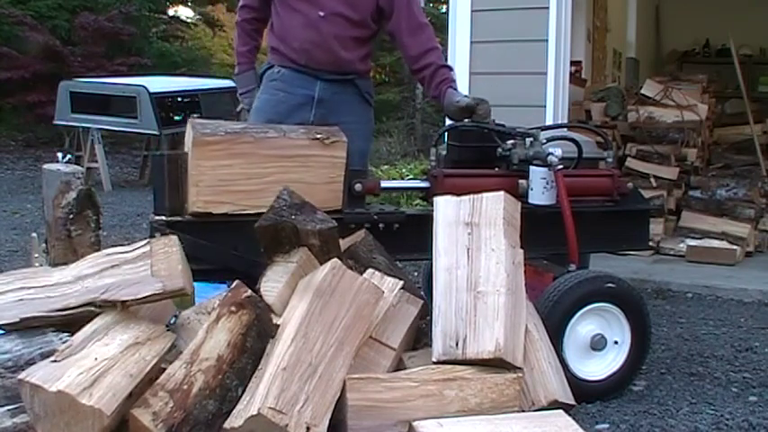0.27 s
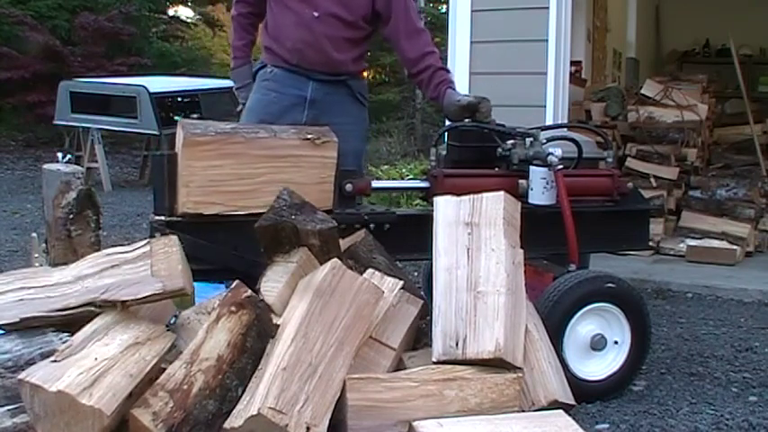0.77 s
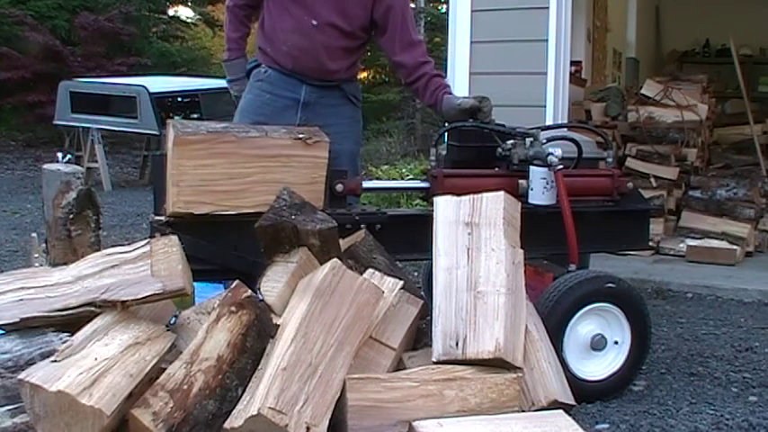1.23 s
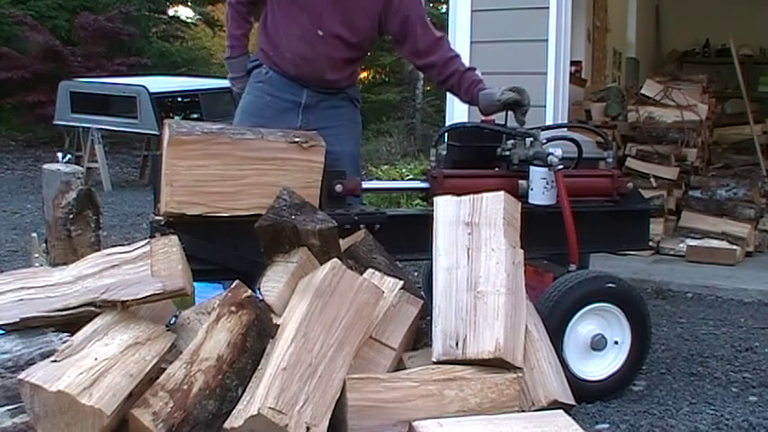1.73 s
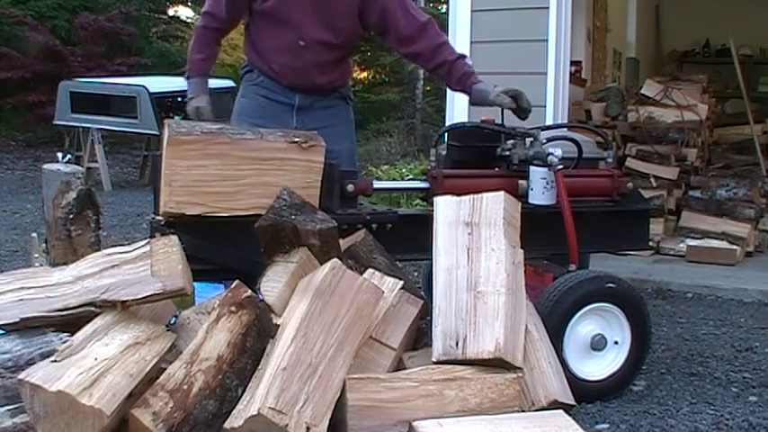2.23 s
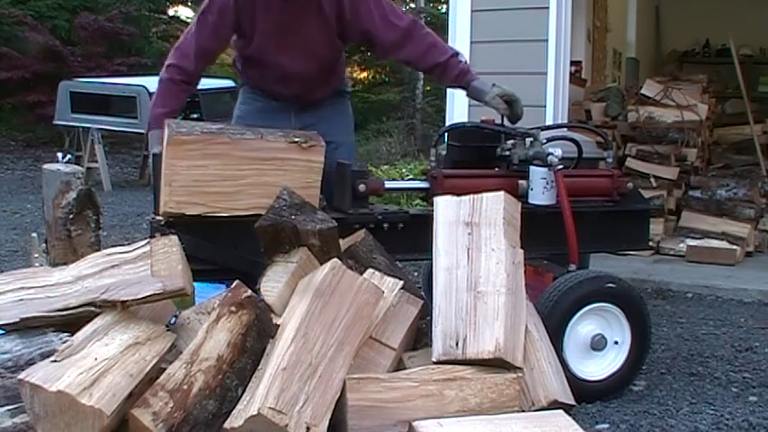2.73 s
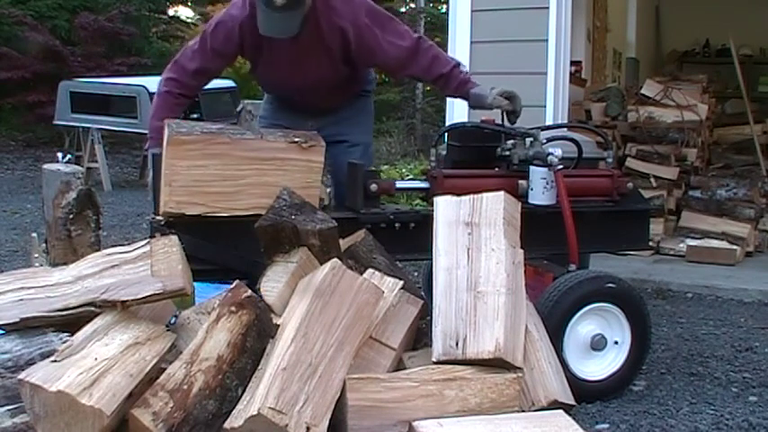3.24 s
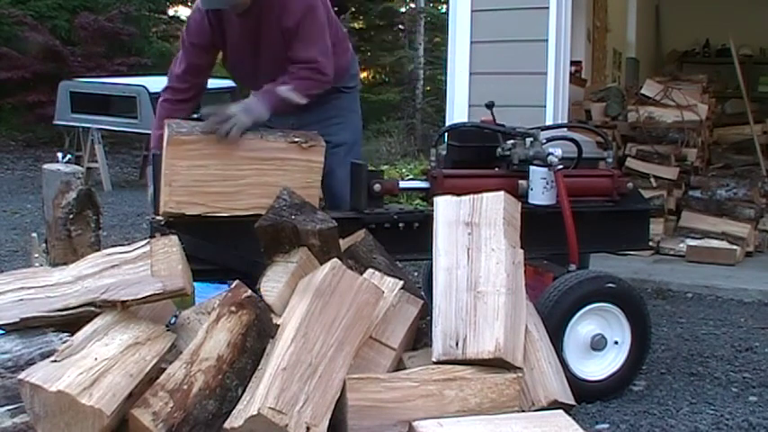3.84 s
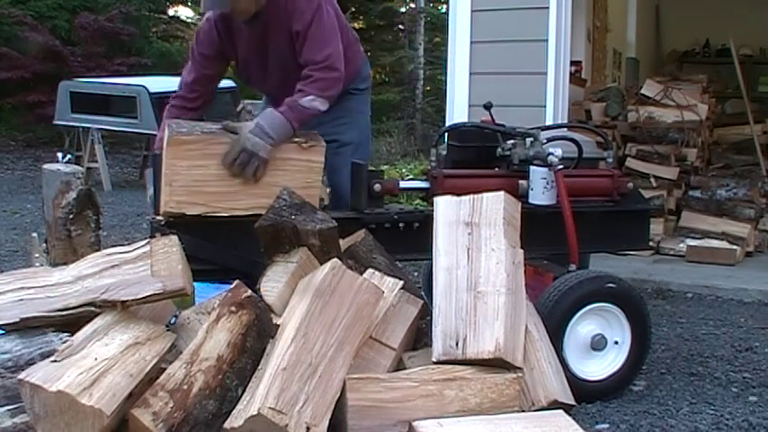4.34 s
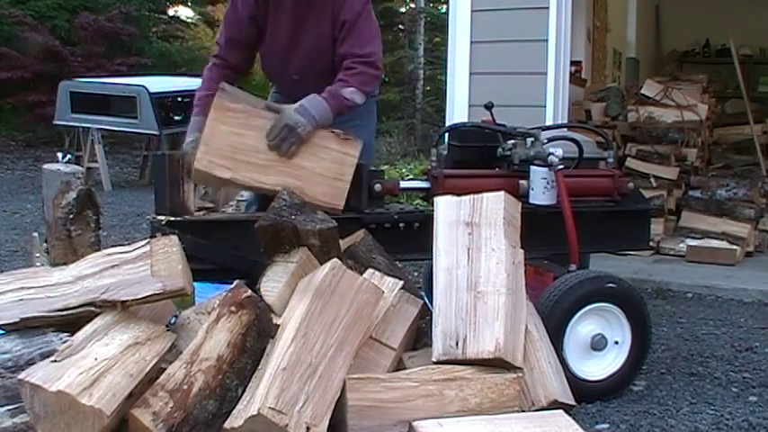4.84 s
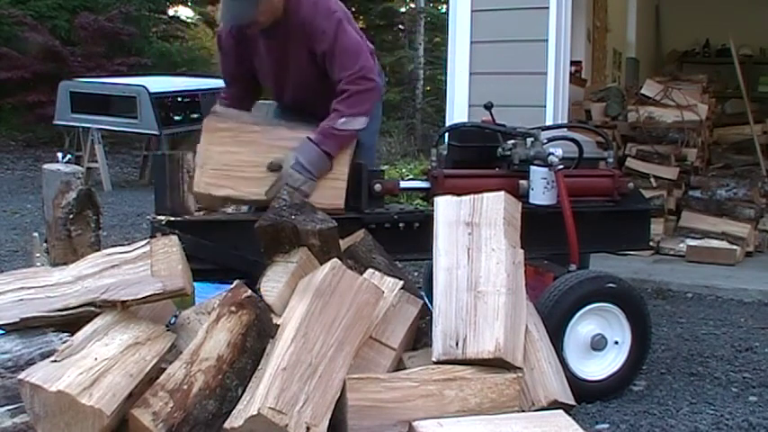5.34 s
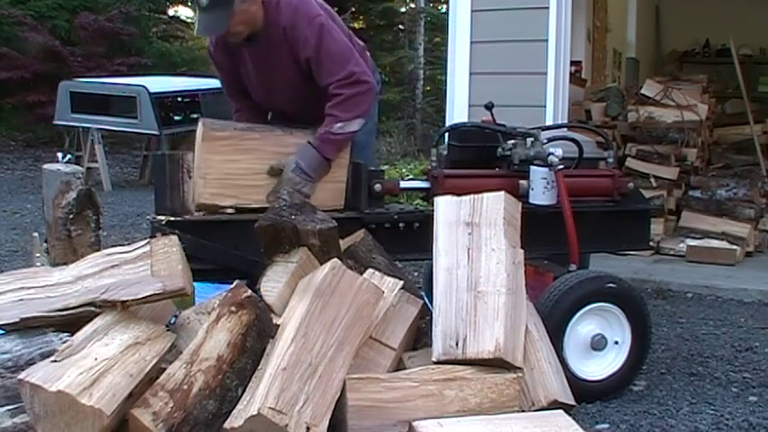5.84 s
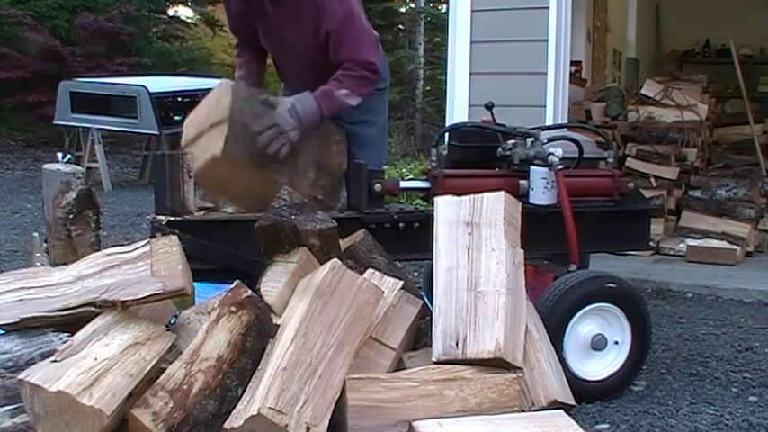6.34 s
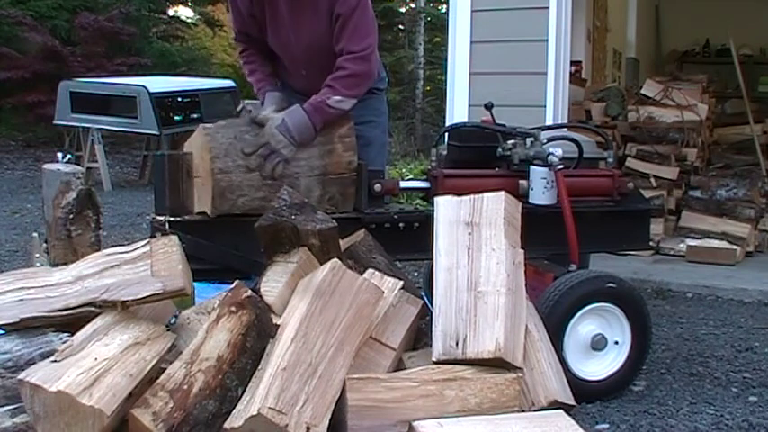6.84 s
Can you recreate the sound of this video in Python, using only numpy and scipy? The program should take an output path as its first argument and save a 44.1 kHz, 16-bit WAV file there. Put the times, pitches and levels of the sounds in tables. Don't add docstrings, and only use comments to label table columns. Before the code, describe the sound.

Outdoors in a yard, a single-cylinder engine drives a log splitter close to a small camera microphone. At once a log tears with a dense volley of bright cracks, the engine sagging, then racing briefly. The cracks stop, the engine swells back to a steady rattling drone, a valve lever clacks, small steel parts tick, and the turned log knocks heavily onto the beam.

```python
import sys
import numpy as np
from scipy import signal
from scipy.fft import rfft, irfft, next_fast_len
from scipy.io import wavfile
from scipy.ndimage import uniform_filter1d, map_coordinates

SR = 44100
rng = np.random.default_rng(int(sys.argv[2]) if len(sys.argv) > 2 else 0)


def amplitude_ratio(level_db):
    exponent = np.asarray(level_db, float) / 20
    return 10 ** exponent


def store_wav(level_fs):
    pcm = np.round(np.clip(np.atleast_2d(level_fs), -1, 1) * 32767)
    wavfile.write(sys.argv[1], SR, pcm.T.astype(np.int16))


N = 313110

# (time [s], firing rate [1/s])
FIRING_RATE = [(0.0, 21.9), (0.08, 21.9), (0.24, 20.7), (0.35, 20.8), (0.57, 24.1), (0.75, 26.5),
               (0.79, 26.5), (0.99, 24.0), (1.16, 24.1), (1.56, 25.17), (2.31, 24.3), (3.42, 24.77),
               (3.82, 25.5), (4.51, 24.7), (5.04, 24.7), (5.75, 25.0), (7.0, 24.9), (7.1, 24.6)]
# (time [s], level [dB])
CAMERA_GAIN = [(0, 0), (.25, -0.5), (.39, -2.5), (.45, -7.5), (.54, -9), (.67, -4.5), (.82, -4),
               (.85, -8.5), (1.3, -9), (1.54, -6), (1.56, -5), (2.2, 1), (3.3, 0), (3.55, -2), (3.96, 1),
               (4.6, -1), (6.05, 0), (6.45, -1.5), (7.1, -0.5)]
# (time [s], share of travelling colour [0-1], oil pressure at the pump [dB],
# shake of the frame [dB], share of bare-beam colour [0-1])
RAM = [(0, 0.29, -32, -14, 0.043), (1.2, 0.61, -14, 0, 0.13), (1.55, 0.11, -9, 1, 0.04),
       (1.9, 0.5, -18, -2, 0.17), (2.3, 0.88, -10, 1, 0.15), (2.8, 0.96, -16, 4.5, 0.17),
       (2.9, 0.593, -2, 3, 0.26), (3.3, 0.67, -2, -13, 0.28), (3.55, 0.55, -11, 2, 0.072),
       (3.8, 0.12, -15, -12, 0.039), (4.1, 0.047, -6, 2, 0.18), (4.35, 0.094, -9, 1, 0.28),
       (4.55, 0.22, -11, 9, 0.98), (5.45, 0.17, -9, -7, 0.94), (5.65, 0.32, -4, 3, 0.19),
       (5.9, 0.15, -1, 3, 0.25), (6.2, 0.13, -3.5, 11, 0.3), (6.4, 0.13, -7.5, -2, 0.27),
       (7.1, 0.12, -7, 4, 0.38)]
# (multiple of firing rate [1], level at rest [dB], ram travelling back [dB], log off the beam [dB])
LOW_ORDERS = [(1, -50, -52, -50), (2, -42, -46, -42), (3, -45, -46, -45), (4.01, -19, -21, -20),
              (5, -18.5, -16, -16), (6.03, -8.5, -7.5, -8), (7.73, -3, -17, -12.5), (8.07, -29, -13, -18),
              (9.22, -12.5, -30.5, -13.5), (10.13, -7.5, -5, -2), (11.53, -23, -3.5, -12.5),
              (12, -5.5, -26.5, -6.5), (13, -16, -23, -11.5), (14, -5.5, -11.5, -9.5), (15, -36, -10, -37),
              (16, -3, -11.5, -23), (16.8, -4, -8, -39), (18, -4, -1.5, -9.5), (18.8, -9.5, -23, -4.5),
              (20, -3, -6, 0), (21.5, -3, -15, -3), (21.8, -7.5, 0.5, -37), (23.2, -5, -13, 4),
              (24, -3.5, -4.5, -7), (24.7, -17, -26, -12)]
# (frequency [Hz], width [Hz], at rest [dB], travelling [dB], beam bare [dB])
ORDER_RESONANCES = [(580, 35, -21, -14, -25), (680, 34, -31, -4.5, -27), (766.4, 14, 5, 0.5, 5),
                    (706, 14, -8, -10, -1), (815, 15, 3, -18, -3.5), (847, 9.2, 2, -13, -17),
                    (902, 18, -10, -9.5, -15), (1019, 7.3, -15.5, -10, 1), (1125, 13, -13, -30, -1),
                    (1313, 45, -9, -11, -15), (1427, 25, -5, -5, -26), (1516, 80, -15, -15.5, -23),
                    (1520, 17, 0, -16, -25), (1679, 20, -14, -6, -2), (1805, 25, -9, 4, -9)]
# (share of cycle [1], level [dB])
TANK_BLOWS = [
    (.12, -4),
    (.32, -3),
    (.52, -2),
    (.94, 0),
]
# (share of cycle [1], level [dB])
PANEL_TAPS = [
    (.08, -3),
    (.31, 0),
    (.56, 0),
    (.91, 0),
]
# (share of cycle [1], level [dB])
VALVE_KNOCKS = [
    (0.06, -9),
    (0.298, -15),
    (0.41, -15),
    (0.502, -15),
    (0.74, -10.5),
    (.92, -25),
]
# (time [s], level [dB])
SKIPPED_FIRINGS = [
    (.868, -10),
    (.946, -11),
]
# (frequency [Hz], density [dB/Hz])
CASING_SPECTRUM = [(180, -135), (300, -8.5), (353, -18), (400, 1), (477, 3.5), (628, 0), (768, 4.5),
                   (915, 5), (962, -2), (1190, -5), (1510, -3.5), (2170, 2), (2460, -4.5), (3410, -24),
                   (6000, -16.5), (7800, -82), (13200, -120)]
# (frequency [Hz], width [Hz], level [dB])
PANEL_MODES = [(778, 21, -2), (987, 47, -6), (1550, 910, 3.5), (1675, 5.4, 11), (2224, 7.4, 10.5),
               (2940, 11, 23), (3400, 86, 27), (4200, 13, 29.5)]
# (frequency [Hz], density [dB/Hz])
FAN_SPECTRUM = [(1470, -6), (2500, -5.5), (3370, -6), (3860, -7), (4140, -6), (5870, -9.5), (10300, -7.5),
                (15200, -23), (16100, -17), (16500, -57)]
# (frequency [Hz], density [dB/Hz])
RUMBLE_SPECTRUM = [(12, -72), (20, -42), (48, -30), (145, 0), (296, -3), (392, -24), (500, -3), (650, -29),
                   (1100, -120)]
# (frequency [Hz], left-right likeness [0-1])
PORT_LIKENESS = [(60, .97), (130, .97), (290, .78), (640, .82), (1410, .62), (3100, .55), (8000, .5),
                 (15000, .45)]
# (frequency [Hz], left over right [dB])
PORT_BALANCE = [(60, 1), (130, 2.3), (290, 1.6), (640, 1.9), (1410, 1.5), (3100, -2.0), (6820, 0.0),
                (15000, 0.0)]
# (frequency [Hz], left leads by [rad])
PORT_LEAD = [(0, 0), (860, -0.3), (2150, -1.4), (2580, -1.7), (2930, -0.8), (3620, -1.2), (4050, -0.8),
             (4390, -1.1), (5430, -0.9), (7670, -1.3), (9220, -1.2), (12500, -2.2), (13500, -2.3),
             (16400, -3.1)]
# (time [s], level [dB])
FIBRE_LEVEL = [(0, -56), (.2, -20), (.43, -18.5), (.48, -27), (.56, -28.5), (.66, -27), (.78, -26),
               (1, -39), (1.3, -52), (1.8, -57), (7.1, -62)]
# (time [s], snap level [dB], body level [dB], body frequency [Hz], snap frequency [Hz])
WOOD_CRACKS = [(0.097, -13, -27, 1700, 8450), (0.166, -20, -21, 1420, 9000), (0.2237, -14, -18, 1500, 8500),
               (0.2327, -14, -14, 1300, 9000), (.238, -9, -12, 1690, 8800), (0.241, -0.5, -15, 1690, 8300),
               (.273, -15, -13, 1500, 9000), (0.2802, -4, -12.5, 3000, 10300), (0.2856, 0, -12, 2100, 8900),
               (0.293, -1, -27, 2260, 8900), (0.314, -6, -23, 1400, 8900), (0.3177, -11, -15, 1620, 9500),
               (0.327, 3, -25, 2010, 9050), (0.3705, -1, -22, 3330, 8600), (.385, -11, -21, 2000, 9000),
               (0.3933, -11, -5, 2580, 10600), (0.428, -14, -19, 1680, 8800), (0.441, -2, -4, 1620, 8350),
               (.4412, -14, -15, 4800, 12500), (0.462, 5, -9, 3690, 10900), (.4835, -18, -36, 3000, 11000),
               (.5128, -9, -24, 3180, 10000), (0.54, -15, -27, 2600, 9500), (.5495, -17, -38, 2500, 10500),
               (0.588, -12, -17.5, 2800, 7500), (0.6102, -10, -27, 2100, 9900),
               (0.6256, -20, -15.5, 1870, 8500), (0.6727, -11, -16, 2520, 9600),
               (.677, -17, -20, 2640, 9000), (0.757, -6, -24, 2240, 8900), (0.761, -3.5, -14, 2300, 8500),
               (0.8170, -3.5, -21, 2540, 9340), (.831, 0.5, -15, 3430, 8120), (.8385, -14, -19, 3700, 8000),
               (1.0184, -3, -16.5, 3700, 9500), (1.018, -20, -24, 1820, 6940), (1.048, -7, -32, 3530, 8700),
               (1.0522, -13, -19, 2500, 8900), (1.1034, -24, -26, 1960, 8000),
               (1.11, -6.5, -38, 1700, 8300), (1.1308, -8, -25, 1850, 10500), (1.1561, -8, -21, 1720, 8160),
               (1.204, -3.5, -24, 1720, 9500)]
# (time [s], peak level [dB], decay t60 [s], low mode [Hz], high mode [Hz])
LOG_THUDS = [(.19, -23, 0.15, 262, 276), (0.229, -21, 0.23, 257, 274), (0.299, -19, 0.1, 250, 262),
             (.671, -9.5, 0.036, 473, 558), (.6725, -15, 0.039, 810, 1260), (.684, -19, 0.033, 517, 890),
             (4.883, -9.5, 0.036, 2085, 2240), (6.3028, 0.5, 0.033, 574, 735),
             (6.3095, -4, 0.014, 604, 780), (6.351, -10, 0.03, 450, 534), (6.4075, -10, 0.07, 620, 680),
             (6.429, -6, 0.02, 506, 696)]
# (time [s], snap level [dB], body level [dB], body frequency [Hz], rise [s])
LEVER_SNAPS = [(1.6824, -13, -17, 5340, 0.00062), (1.7014, -15, -30, 5000, .0005),
               (3.4341, -3.5, -13.5, 4600, 0.0013), (3.542, -15, -36, 4080, .0017),
               (3.5511, -16, -19, 4500, 0.0041), (3.569, -17, -28, 4200, 0.0059),
               (3.583, -15, -22, 4200, 0.0026), (4.504, -3, -34, 6250, 0.00083),
               (4.526, -8, -36, 6000, 0.0009), (4.58, -13, -17, 4000, .0009),
               (5.655, -11, -22, 3480, 0.0015)]
# (time [s], peak level [dB], frequency [Hz], decay t60 [s])
STEEL_TICKS = [(3.5153, -24, 10300, .03), (3.437, -15, 10200, .05), (3.436, -24, 14500, .025),
               (3.553, -27, 14700, .025), (3.557, -13, 10200, .03), (3.579, -31, 14800, .03),
               (3.585, -23, 10200, .04), (3.727, -30, 14600, .04), (4.6637, -22, 10100, .02),
               (5.851, -19, 11000, .03), (5.876, -24, 9950, .04), (5.897, -17, 9900, .04),
               (6.311, -17, 11200, .02), (6.4042, -17, 9900, 0.027), (6.455, -21, 10100, .06),
               (6.4546, -31, 14750, .07)]

STEP = 6
REST_HZ, RETURN_HZ = 24.85, 24.45


def unit(x):
    return x / np.sqrt(np.mean(x ** 2) + 1e-20)


def along(points, hz):
    f, v = np.transpose(points)
    return np.interp(np.log(hz + 1), np.log(f + 1), v)


def curves(rows):
    s, *cols = np.transpose(rows)
    return [np.interp(np.arange(N) / SR, s, c) for c in cols]


def wobble(rate):
    knots = rng.standard_normal(int(N * rate / SR) + 4)
    return map_coordinates(knots, [np.arange(N) * rate / SR], order=1)


def filtered(x, response):
    m = next_fast_len(N + SR // 4)
    return irfft(rfft(x, m) * response(np.fft.rfftfreq(m, 1 / SR)), m)[..., :N]


def resonance(f, hz, width_hz):
    return 1j * f * width_hz / (hz * hz - f * f + 1j * f * width_hz)


def ports(direct, scattered):
    def turn(hz):
        return np.arccos(np.clip(along(PORT_LIKENESS, hz), 0, 1)) / 2

    def half(hz):
        lead = np.interp(hz, *np.transpose(PORT_LEAD))
        return amplitude_ratio(along(PORT_BALANCE, hz) / 2) * np.exp(.5j * lead)

    both = np.array([direct, scattered])
    a, b = filtered(both, lambda hz: [np.cos(turn(hz)), np.sin(turn(hz))])
    return filtered(np.array([a + b, a - b]), lambda hz: [half(hz), 1 / half(hz)])


def strength(k, speed, column):
    if k > 25:
        between = amplitude_ratio(-19)
        passed = sum(amplitude_ratio(row[2 + column]) * abs(resonance(k * speed, row[0], row[1])) ** 2
                     for row in ORDER_RESONANCES)
        return 20 * np.log10(between + passed)
    place = k * speed / (REST_HZ, RETURN_HZ, REST_HZ)[column] if k < 10 else k + 0 * speed
    return np.interp(place, *np.transpose(LOW_ORDERS)[[0, column + 1]])


def orders(cycle, first, last, spread, drift_db, slip, blows=((0, 0),)):
    time = np.arange(0, N, STEP)
    coarse = np.arange(0, N, 441)
    share, _, _, off_beam = curves(RAM)
    speed, travel, bare = curves(FIRING_RATE)[0][coarse], share[coarse], off_beam[coarse]

    def slow(rate):
        return np.interp(time * rate / SR, np.arange(rate * 8), rng.standard_normal(rate * 8))

    out = 0
    for k in range(first, last + 1):
        pattern = sum(amplitude_ratio(b) * np.exp(-2j * np.pi * k * at) for at, b in blows)
        angle = 2 * np.pi * k * cycle[::STEP] - np.pi / 2 + np.angle(pattern)
        angle = angle + rng.normal(0, spread) + slip * slow(10)
        db = drift_db * slow(2)
        if last > first:
            level = (1 - travel) * strength(k, speed, 0) + travel * strength(k, speed, 1)
            level = (1 - bare) * level + bare * strength(k, speed, 2)
            db = db + np.interp(time, coarse, level)
        out = out + amplitude_ratio(db) * np.cos(angle + rng.uniform(0, 2 * np.pi) * np.array([[0], [1]]))
    return unit(signal.resample_poly(out, STEP, 1, axis=1)[:, :N])


def clatter(cycle):
    turns = np.arange(int(cycle[-1]) + 1)
    blows = np.zeros(N)
    for share, db in VALVE_KNOCKS:
        place = turns + share + rng.normal(0, 0.0075, len(turns))
        at = np.interp(place, cycle, np.arange(N)).astype(int)
        blows[at] += amplitude_ratio(db + rng.normal(0, 1.3, len(turns)))
    t = np.arange(SR // 50) / SR
    stamp = signal.fftconvolve(blows, amplitude_ratio(-60 * t / 0.01) * rng.standard_normal(len(t)))[:N]
    gate = signal.fftconvolve(blows, t * amplitude_ratio(-60 * t / 0.046))[:N]
    return unit(stamp), gate / gate.mean()


def layer_db(at_rest, per_gain, per_sag, travelling):
    sag = REST_HZ - curves(FIRING_RATE)[0]
    return at_rest + per_gain * curves(CAMERA_GAIN)[0] + per_sag * sag + travelling * curves(RAM)[0]


def engine():
    cycle = np.cumsum(curves(FIRING_RATE)[0]) / SR + .06
    travel, oil_db, shake_db, _ = curves(RAM)
    casing_db = layer_db(-24, per_gain=1.29, per_sag=0.59, travelling=0.49)
    exhaust_db = layer_db(-34, per_gain=1.23, per_sag=0.36, travelling=1.4)
    silencer_db = layer_db(-32.5, per_gain=1.33, per_sag=-0.56, travelling=0.27)
    fan_db = layer_db(-22.5, per_gain=1.2, per_sag=0.58, travelling=0.14)
    for s, db in SKIPPED_FIRINGS:
        exhaust_db = exhaust_db + db * np.exp(-((np.arange(N) / SR - s) / 0.015) ** 4)
    stamp, gate = clatter(cycle)

    def noise():
        return rng.standard_normal((2, N))

    def metal(f):
        modes = 1 + sum(amplitude_ratio(db) * resonance(f, hz, w) for hz, w, db in PANEL_MODES)
        return amplitude_ratio(along(CASING_SPECTRUM, f)) / (1 + (600 / (f + 1)) ** 5) * modes

    def blades(f):
        return amplitude_ratio(along(FAN_SPECTRUM, f)) * (0.18 / (1 + (f / 90) ** 4) + 1 / (1 + (480 / (f + 1)) ** 2))

    def duct(f):
        return amplitude_ratio(along(RUMBLE_SPECTRUM, f)) * (.2 + 1 / (1 + (140 / (f + 1)) ** 8))

    thump = orders(cycle, 2, 9, .2, .6, .04)
    pipe = orders(cycle, 10, 13, 1, 1, .06)
    rumble = amplitude_ratio(-19) * unit(filtered(noise(), duct))
    exhaust = amplitude_ratio(exhaust_db) * (thump + amplitude_ratio(-2.0) * pipe + rumble)

    early = cycle + .09 * uniform_filter1d(travel, size=8000)
    blow_width = .075
    beat = sum(amplitude_ratio(db) * np.exp((np.cos(2 * np.pi * (early - at)) - 1) / (2 * np.pi * blow_width) ** 2)
               for at, db in TANK_BLOWS[2:])
    silencer = amplitude_ratio(silencer_db) * orders(early, 14, 25, .8, 1.5, .1, TANK_BLOWS)
    tank = unit((1.3 + beat) * orders(early, 26, 45, .4, 1.3, .12, TANK_BLOWS))
    cover = unit((2 + gate) * orders(early, 46, 72, .4, 1.6, .2, PANEL_TAPS))
    ring = amplitude_ratio(-5.5) * tank + amplitude_ratio(-5.5) * cover
    whine = amplitude_ratio(-0.5 + oil_db) * unit(1.5 + beat) * orders(cycle, 36, 36, 3, 2.5, .35)
    shroud = amplitude_ratio(-11 + shake_db) * orders(cycle, 58, 64, 3, 5, 1.6)
    rattle = unit(filtered(.4 * stamp * [[1], [0]] + unit((1.1 + gate) * noise()), metal))
    rattle = amplitude_ratio(-.7 + .9 * wobble(5) + wobble(17)) * rattle
    casing = amplitude_ratio(casing_db) * (rattle + amplitude_ratio(1 + wobble(25)) * ring + whine + shroud)

    air = (0.52 + gate) * amplitude_ratio(0.64 * wobble(40)) * noise()
    fan = amplitude_ratio(fan_db) * unit(filtered(air, blades))
    return ports(*(casing + fan + exhaust + silencer))


def tearing():
    count = 6000
    at, size = rng.integers(0, N, count), rng.exponential(1, count)
    snaps = amplitude_ratio(4.3 * np.minimum(size, 2.3)) * rng.choice([-1, 1], count)
    grains = np.bincount(at, snaps, N)
    bright = unit(filtered(grains, lambda f: resonance(f, 7900, 5200) ** 2 + 2.3 * resonance(f, 1100, 4000)))
    return ports(*(amplitude_ratio(curves(FIBRE_LEVEL)[0]) * [bright, np.roll(bright, 130)]))


def snaps_and_knocks(events):
    out, t = np.zeros((2, N + SR)), np.arange(2048) / SR
    f = np.fft.rfftfreq(len(t), 1 / SR)
    for s, snap_db, body_db, body_hz, rise, snap_hz in events:
        burst = rng.standard_normal((4, len(t))) * (1 - np.exp(-t / rise)) ** 2
        shape = amplitude_ratio(-60 * t / (0.00063 + 7 * rise)) + 0.062 * amplitude_ratio(-60 * t / 0.031)
        bright = resonance(f, snap_hz, 6200) ** 2 / (1 + (f / 13500) ** 8)
        snap = irfft(rfft(shape * (burst[0] + .5 * burst[1:3])) * bright)
        click = (np.arange(len(t)) == round(rise * SR)) * 1.1
        dull = resonance(f, body_hz, 0.78 * body_hz) ** 2
        body = irfft(rfft(shape * 0.28 * burst[3] + click) * dull)
        both = amplitude_ratio(snap_db) * snap / abs(snap).max() + amplitude_ratio(body_db + 7.5) * body / abs(body).max()
        out[:, round(s * SR):][:, :len(t)] += both * amplitude_ratio([[1.5], [-1.5]])
    return out[:, :N]


def cracks():
    return snaps_and_knocks([(*c, 0.00045, snap_hz) for *c, snap_hz in WOOD_CRACKS])


def thuds():
    out, t = np.zeros(N + SR), np.arange(SR // 8) / SR
    rise = (1 - np.exp(-t / .0012)) ** 2
    for s, db, t60, low_hz, high_hz in LOG_THUDS:
        beam = (235, -4.5 + 0.8 * db)
        modes = [(low_hz, 0), (high_hz, 0), (1.7 * high_hz, -19), beam]
        ring = sum(amplitude_ratio(level) * np.sin(2 * np.pi * hz * t) for hz, level in modes)
        out[round(s * SR):][:len(t)] += amplitude_ratio(db - 1.5 - 60 * t / max(t60, .005)) * ring * rise
    return filtered(out[:N], lambda f: (1j * f / (130 + 1j * f)) ** 2) * amplitude_ratio([[1.1], [-1.1]])


def lever():
    return snaps_and_knocks([(*c, 9500) for c in LEVER_SNAPS])


def pings():
    out, t = np.zeros(N + SR), np.arange(SR // 10) / SR
    for s, db, hz, t60 in STEEL_TICKS:
        wander = np.cumsum(rng.normal(0, .08, len(t)))
        envelope = amplitude_ratio(db - 60 * t / max(t60, .005)) * (1 - np.exp(-t / 0.00075))
        out[round(s * SR):][:len(t)] += envelope * np.sin(2 * np.pi * hz * t + wander)
    return out[:N] * amplitude_ratio([[1.5], [-1.5]])


def scene():
    return engine() + tearing() + cracks() + thuds() + lever() + pings()


def roll_off(x):
    return signal.sosfilt(signal.butter(12, 16490, fs=SR, output="sos"), x)


def record(dry):
    heard = filtered(dry, lambda f: (1j * f / (60 + 1j * f)) ** 3 / (1 + (f / 15800) ** 200))
    over_db = np.maximum(20 * np.log10(abs(heard).max(0) + 1e-9) + 9, 0)
    back_db = 55 * np.arange(N) / SR
    duck_db = np.maximum.accumulate(0.52 * over_db + back_db) - back_db
    late_db = np.roll(uniform_filter1d(duck_db, size=200), 230)
    level = heard * amplitude_ratio(-late_db)
    level = level / (1 + abs(level / 1.15) ** 6) ** (1 / 6)
    return roll_off(level)


dry = scene()
out = record(dry)
store_wav(out)
```